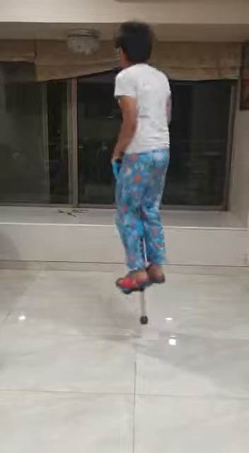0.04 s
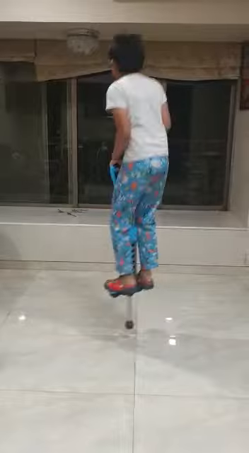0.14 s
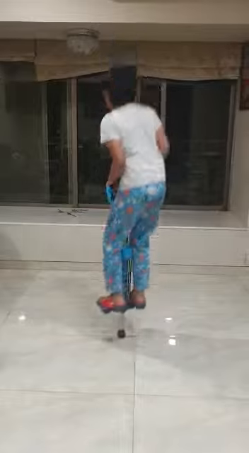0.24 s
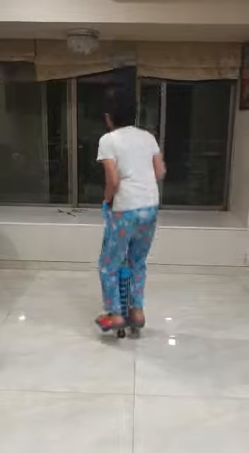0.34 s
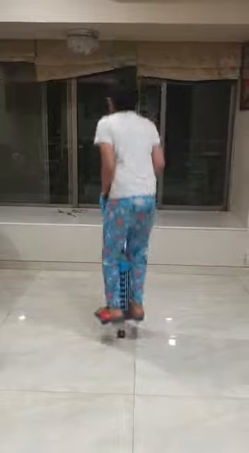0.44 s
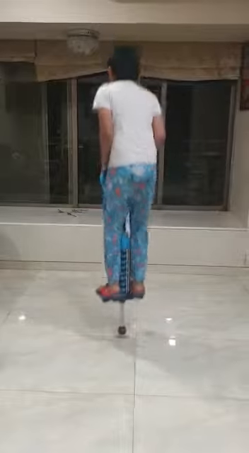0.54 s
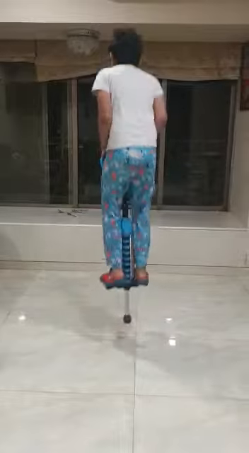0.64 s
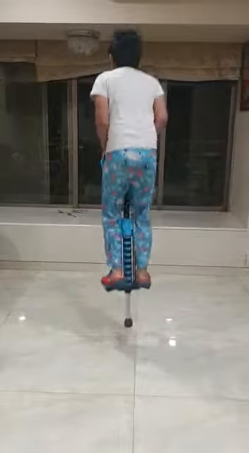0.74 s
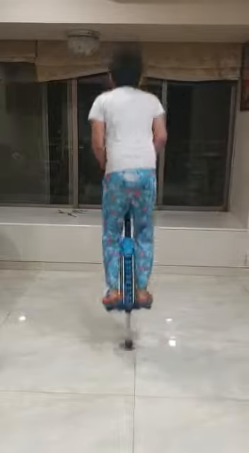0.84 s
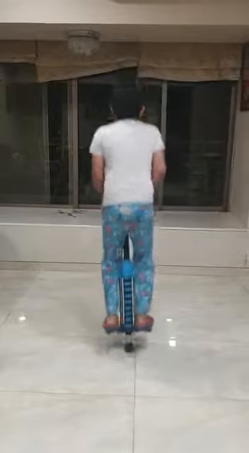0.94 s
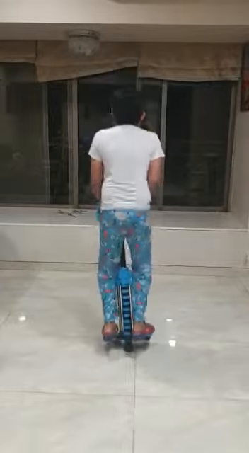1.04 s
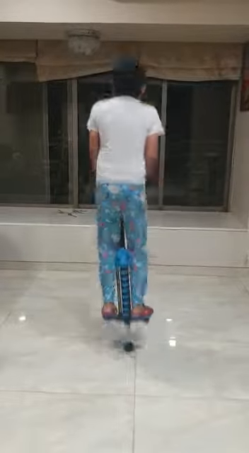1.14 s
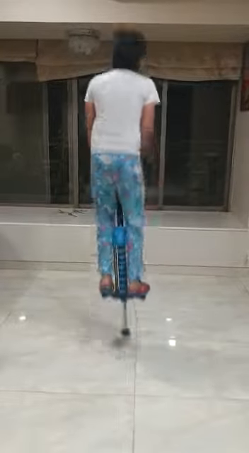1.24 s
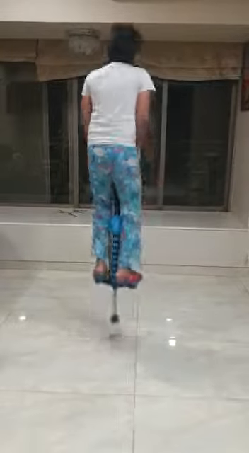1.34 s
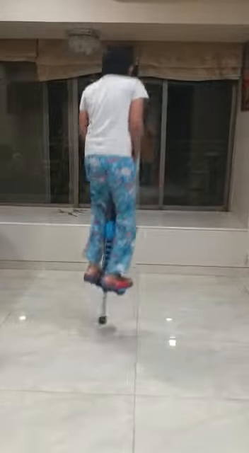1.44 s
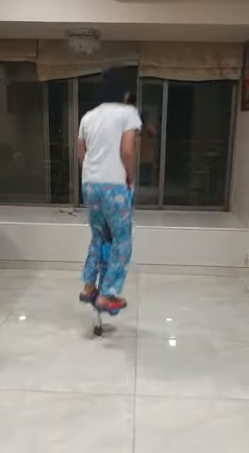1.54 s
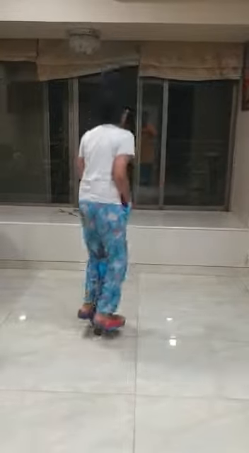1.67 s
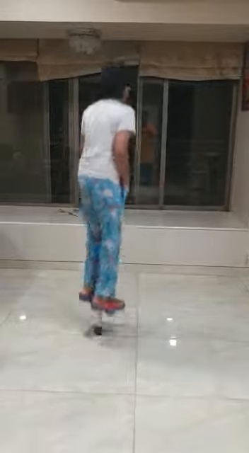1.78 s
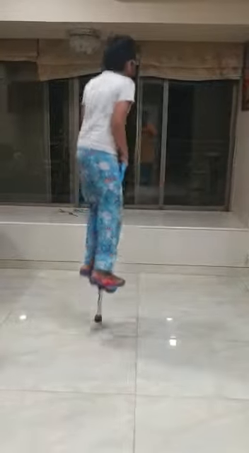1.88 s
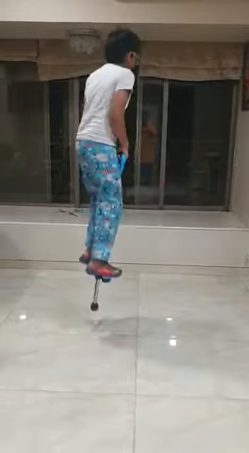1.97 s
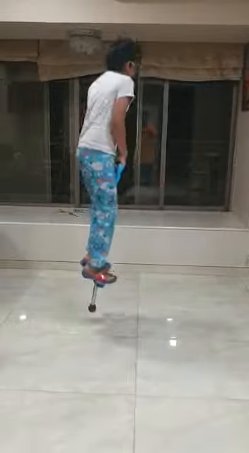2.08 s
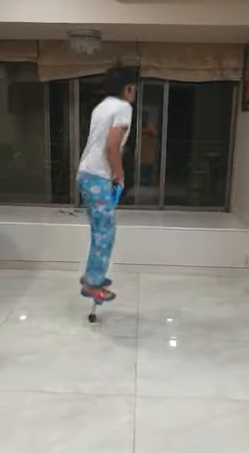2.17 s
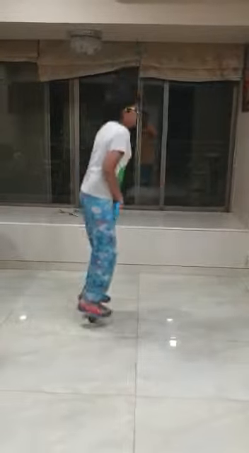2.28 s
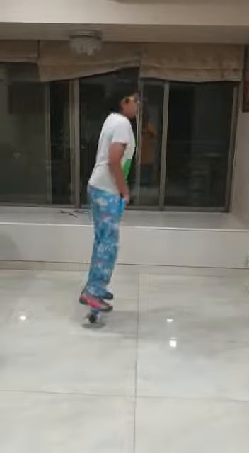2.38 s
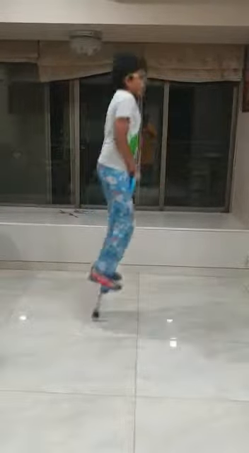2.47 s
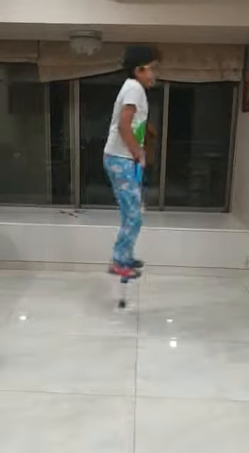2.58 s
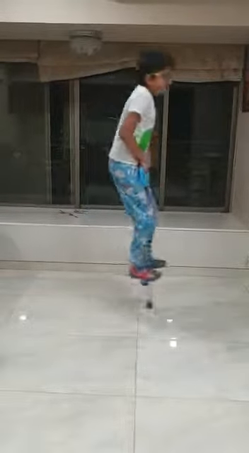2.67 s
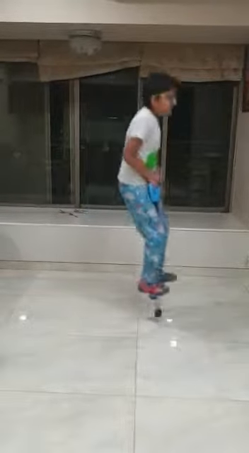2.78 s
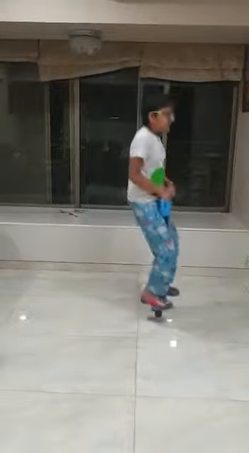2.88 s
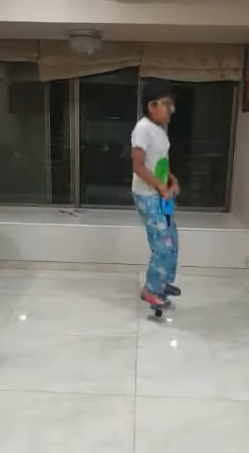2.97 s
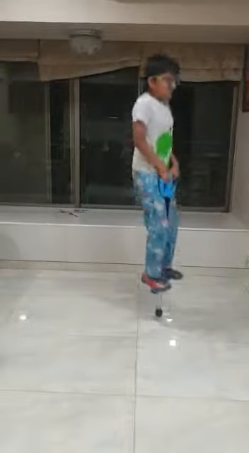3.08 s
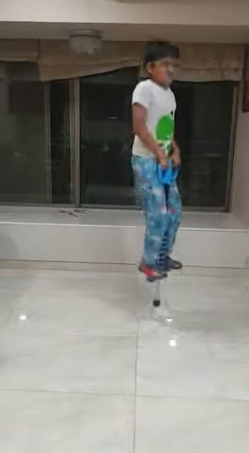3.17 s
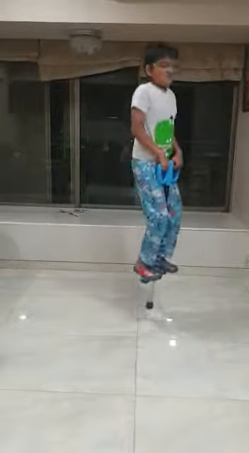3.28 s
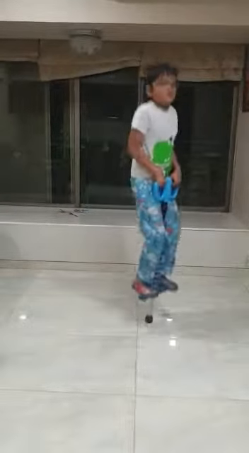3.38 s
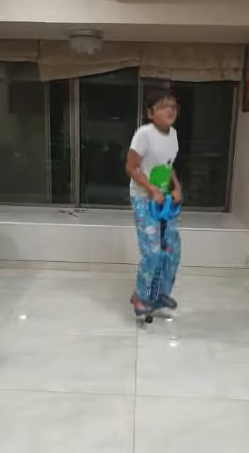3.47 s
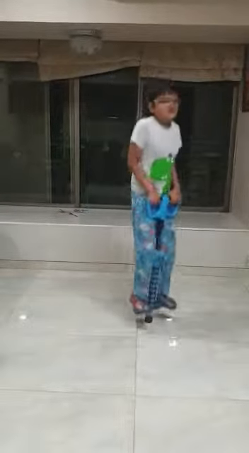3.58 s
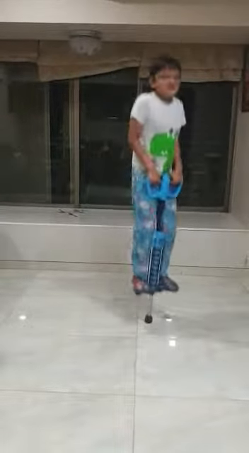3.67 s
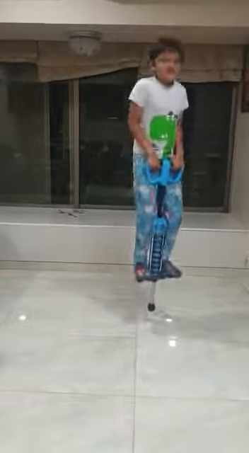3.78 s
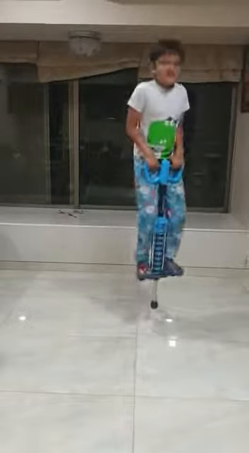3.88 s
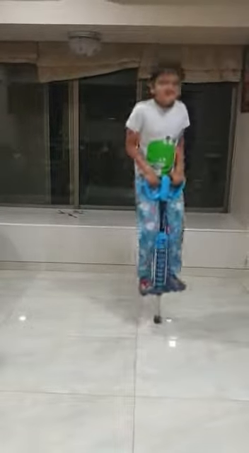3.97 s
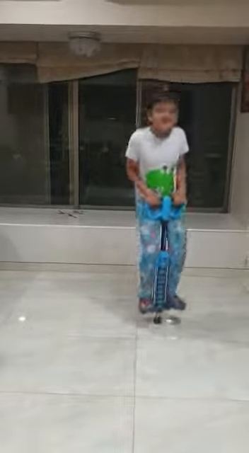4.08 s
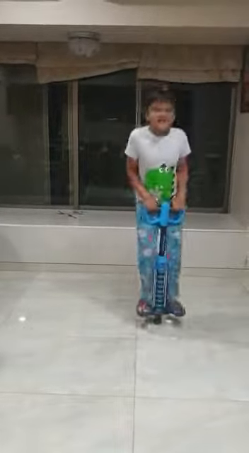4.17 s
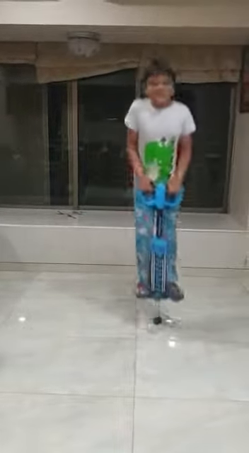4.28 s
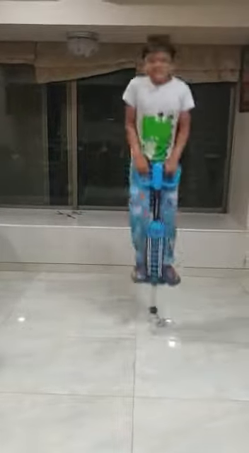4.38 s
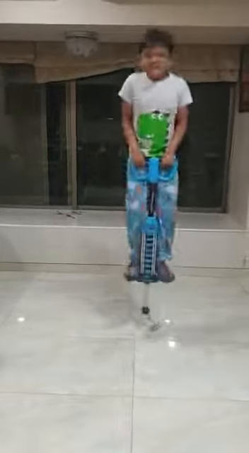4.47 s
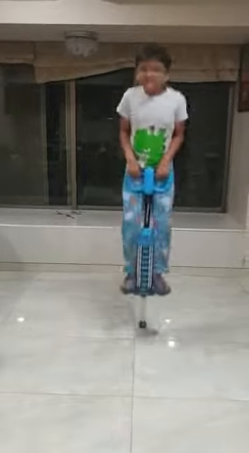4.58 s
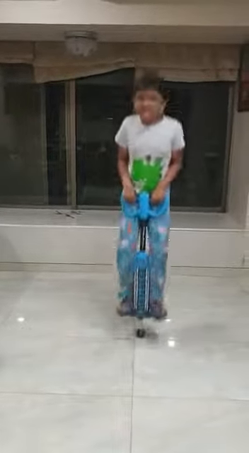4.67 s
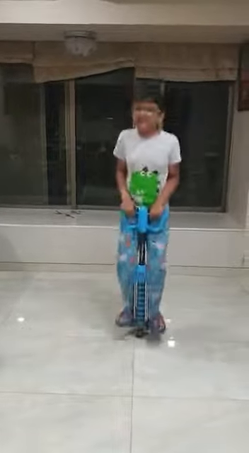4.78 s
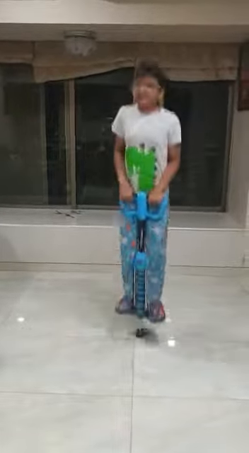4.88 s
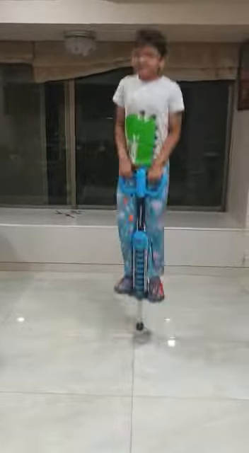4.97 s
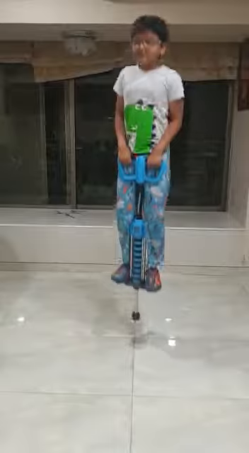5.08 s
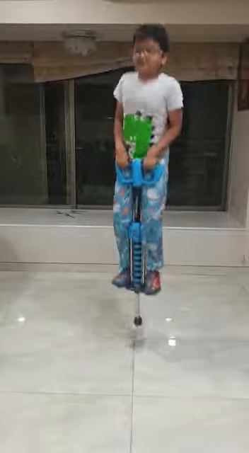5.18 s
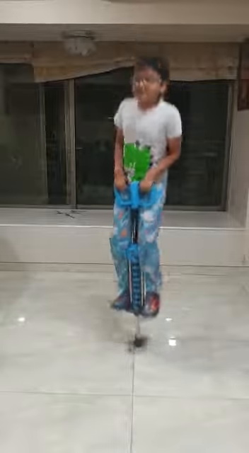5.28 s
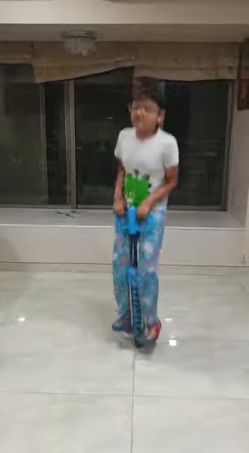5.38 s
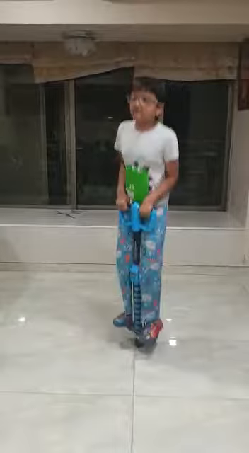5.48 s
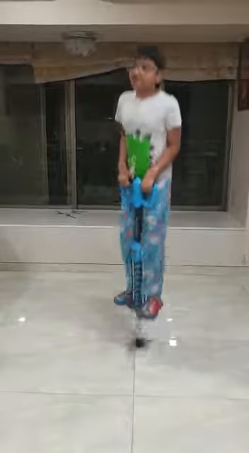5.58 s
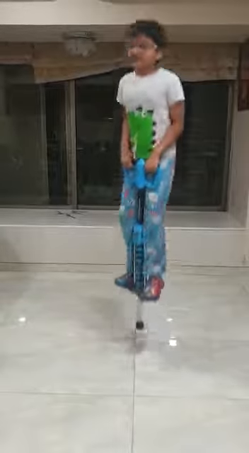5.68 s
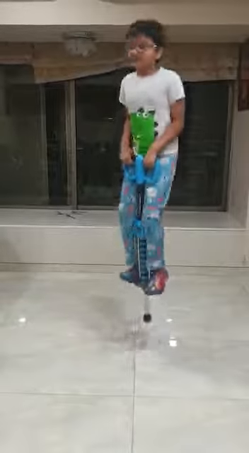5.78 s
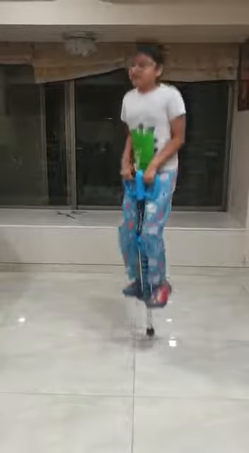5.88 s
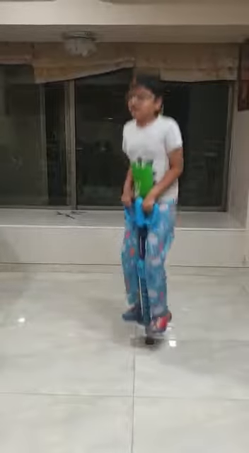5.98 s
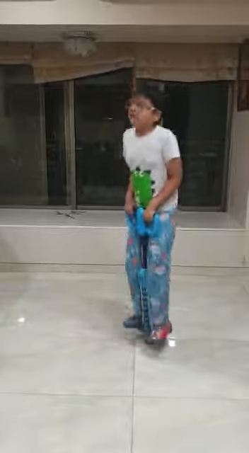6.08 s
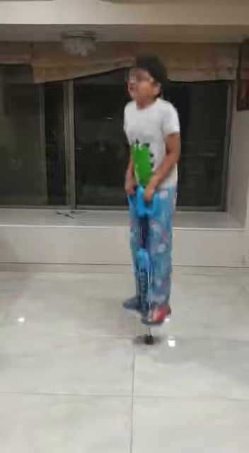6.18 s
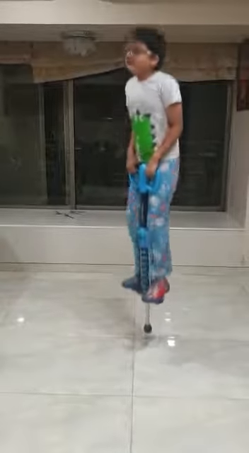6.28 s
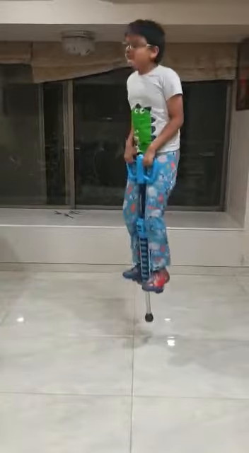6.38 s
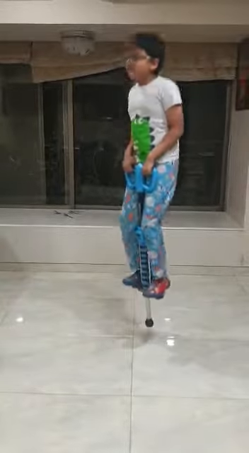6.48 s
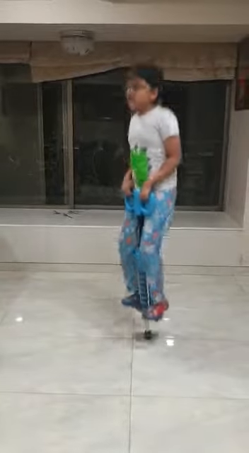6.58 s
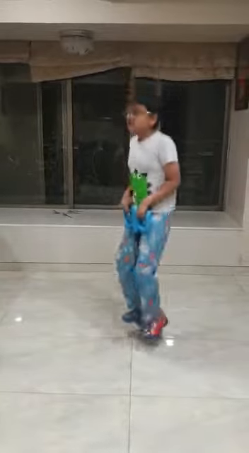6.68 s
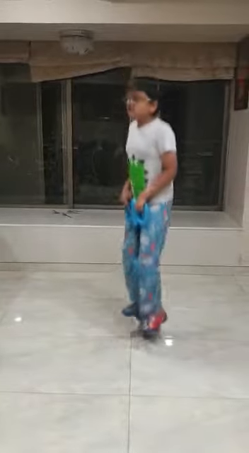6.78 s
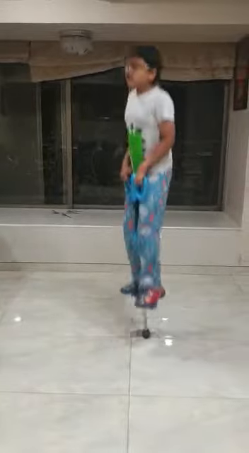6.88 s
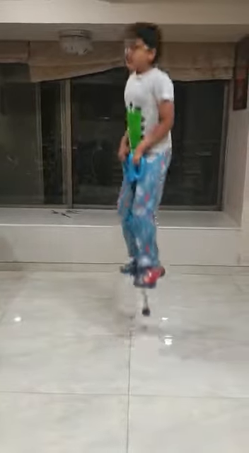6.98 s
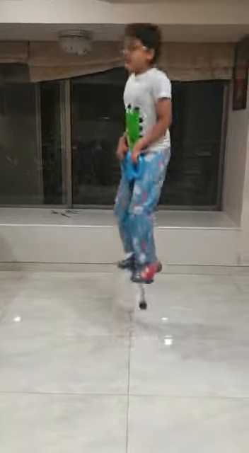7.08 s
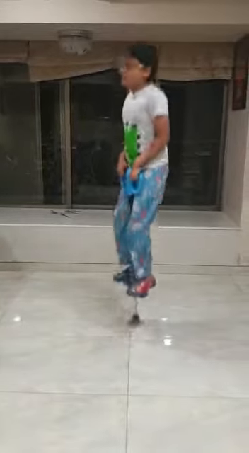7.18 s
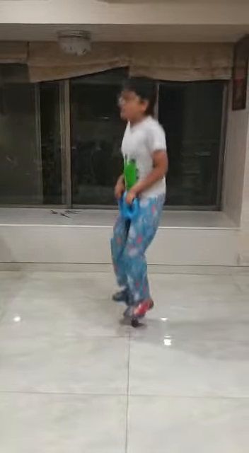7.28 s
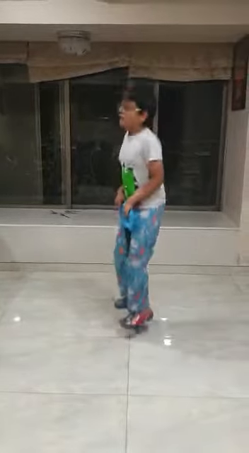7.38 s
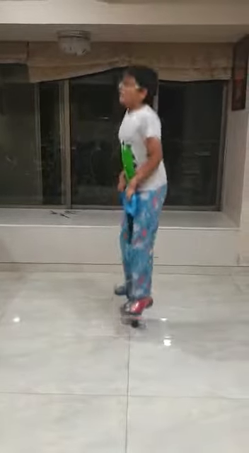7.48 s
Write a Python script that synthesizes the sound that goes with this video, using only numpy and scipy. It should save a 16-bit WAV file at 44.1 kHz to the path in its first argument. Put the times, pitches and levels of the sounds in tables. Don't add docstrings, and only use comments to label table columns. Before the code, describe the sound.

A fading clack opens, then a pogo stick bounces about every two thirds of a second. Each landing is a hard knock with a dull thud, then a faint scrape and spring rumble, a low thump or tick at the bottom, a rising scrape and a metal-on-plastic clack. Bare, echoing tiled living room, with the microphone a few metres away and slightly brighter on the right.

```python
import sys
import numpy as np
from scipy import signal
from scipy.fft import rfft, irfft
from scipy.io import wavfile

SR = 44100
rng = np.random.default_rng(int(sys.argv[2]) if len(sys.argv) > 2 else 0)


def digitize_waveform(pressure):
    field = np.atleast_2d(pressure).T
    bounded = np.clip(field, -1, 1)
    quanta = np.round(bounded * 32767).astype(np.int16)
    wavfile.write(sys.argv[1], SR, quanta)


def nominal_scale(level):
    x = np.asarray(level, float) / 20
    return 10 ** x


N = 332514
LEAD = 4410
LONG, TAIL = N + LEAD, 30000

# [t/s, knock level/dB, scrape level/dB as the shaft slows, spring rumble level/dB]
LANDINGS = [(0.2708, -9, -32.5, -23), (0.9147, -6, -31.5, -41), (1.5726, -9.5, -31, -24),
            (2.2057, -10.5, -26.5, -33), (2.801, -10, -32, -33.5), (3.4107, -14, -30.5, -34),
            (4.0347, -7, -23, -33), (4.6750, -8, -29, -24.5), (5.3275, -7.5, -30, -28),
            (5.9642, -7, -29, -31), (6.598, -9, -32, -29.5), (7.2630, -11, -34, -34)]
# [t/s, touch level/dB, treble edge of the knock level/dB]
TOUCHES = [(0.2684, -18, -0.5), (.9130, -16.5, -6), (1.572, -24, 6), (2.2030, -18, -4.5), (2.7975, -18, -2),
           (3.4090, -28, 6.5), (4.0318, -24, 1), (4.6708, -21, -0.5), (5.3263, -24, 3),
           (5.9625, -14.5, 2.5), (6.5947, -17.5, -9), (7.2568, -22, 2)]
# [t/s, thump level/dB, tick level/dB]
BOTTOMS = [
    (.405, -7.5, -30),
    (1.055, -17, -17.5),
    (1.695, -9, -19),
    (2.355, -15, -16),
    (4.160, -16, -15),
    (4.800, -18, -17),
    (5.438, -8, -14.5),
    (6.076, -10, -11.5),
    (6.765, -15, -27),
    (7.386, -18, -26),
]
# [t/s, push as scrape level/dB, spring rumble level/dB before the halt]
REBOUNDS = [(.476, -24.5, -31), (1.125, -22.5, -27), (1.773, -22.5, -29.5), (2.417, -23.5, -32),
            (3.024, -27.5, -31.5), (3.620, -24.5, -27.5), (4.232, -21.5, -27.5), (4.872, -21, -30),
            (5.535, -23, -28), (6.152, -20, -26.5), (6.815, -23.5, -33), (7.468, -27, -32.5)]
# [t/s, clack level/dB]
STOPS = [(0.58, -7.5), (1.2366, -7), (1.877, -11.5), (2.512, -8), (3.129, -11), (3.731, -13.5),
         (4.347, -9.5), (4.986, -10.5), (5.631, -10), (6.263, -11), (6.9187, -8)]
# [t/s, clack level/dB]
EARLIER_STOP = (-0.05, -10.5)

# [f/Hz, level/dB per Hz]
KNOCK = [(240, -30), (400, 2.5), (747, -12), (999, 1), (1260, -4), (1890, -5.5), (2310, -1.5), (3090, -4.5),
         (6420, -10), (8700, -10), (12900, -7.5), (15300, -15)]
# [f/Hz, level/dB per Hz]
THUD = [(71, -31), (120, -4.5), (183, -17.5), (226, 0), (286, -1), (356, -3), (653, -9), (900, -7),
        (1170, -18.5), (1980, -120)]
# [f/Hz, level/dB per Hz]
CLACK = [(65, -36), (110, -10.5), (290, -8), (551, -9.5), (663, -8), (799, -5.5), (962, -0.5), (1790, -6.5),
         (1900, -1.5), (2490, 2.5), (2870, -2.5), (7900, -10.5), (8760, -12.5), (11500, -9), (15300, -14)]
# [f/Hz, level/dB per Hz]
SCRAPE = [(760, -42), (1300, -3), (1580, -2.5), (2650, 1), (3390, -4), (4440, -3.5), (5510, -11.5),
          (6910, -10.5), (8590, -14), (13100, -17), (15300, -18)]
# [f/Hz, level/dB per Hz]
RUMBLE = [(24, -17), (40, -23), (74, 2.5), (124, -12.5), (254, -1), (511, -1), (581, 2), (639, 3), (893, 4),
          (1170, -1), (1800, -9), (2340, -38), (3960, -120)]
# [f/Hz, level/dB per Hz]
THUMP = [(50, -15), (110, -4), (160, -1), (260, -7), (450, -18), (1000, -38)]
# [f/Hz, level/dB per Hz]
HUSH = [(25, -22), (45, 2), (80, 3), (300, -0.5), (1000, -5.5), (3000, -11.5), (8000, -20), (16000, -39)]

# [f/Hz, level/dB, t60/s]
BOOMS = [(70, -32, 0.4), (159.4, -36, 0.35), (208, -36, 0.23), (244.3, -35.5, 0.23), (328, -35, 0.6)]
# [f/Hz, t60/s]
ROOM_T60 = [(60, 0.5), (160, 0.53), (420, 0.62), (1100, 0.69), (2900, 0.64), (7000, 0.6), (14000, 0.38)]
# [f/Hz, correlation]
LIKENESS = [(60, 1), (130, 0.98), (290, 1), (640, 0.26), (1410, -0.2), (3100, 0.095), (6820, -0.043),
            (15000, 0.06)]
# [f/Hz, left minus right level/dB]
PAN = [(40, 1.5), (110, -0.5), (200, -1.5), (380, -3), (700, -6), (1290, -4.5), (2380, -6), (4400, -6.5),
       (6500, -7), (8500, -4), (10500, 4.5), (12000, -8), (13500, -6), (15500, -2)]
# [f/Hz, left level/dB, right level/dB]
DIRECT = [(100, -6, -7), (600, -13.5, -10.5), (2430, -14.5, -10.5), (5000, -27, -9), (9100, -25, -10.5),
          (11400, -1, -3), (13800, -28, -4.5)]

HUSH_DB = -47.5
THUD_DB, THUD_FOLLOWS = 5.5, 0.35
SEAT_S, GRAZE_DB = 0.001096, -11.5
FRAME_DB = -6.0
RING_OVER_PUSH_DB, USUAL_PUSH_DB = 15.0, -25
SCRAPE_DOWN_DB, SCRAPE_UP_END_DB = -29, -31
RUMBLE_UP_DB, RUMBLE_FOLLOWS = -29.5, 0.54
GRIP_S, HOLD_S, SLOWING_S, HALT_S = 0.026, .01, 0.089, .035
SWELL_S, EASE_S, LIFT_S, LAST_STOP_S = 0.025, 0.023, 0.0063, 7.56
TOP_HZ = 15600


def at_hz(points, hz, column=1):
    points = np.array(points)
    return np.interp(np.log(hz + 1), np.log(points[:, 0]), points[:, column])


def rms_one(x):
    return x / np.sqrt(np.mean(x ** 2) + 1e-20)


def causal(points, column=1, size=8192):
    hz = np.arange(size // 2 + 1) * SR / size
    cepstrum = irfft(np.log(nominal_scale(at_hz(points, hz, column))))
    cepstrum[1:size // 2] *= 2
    cepstrum[size // 2 + 1:] = 0
    return irfft(np.exp(rfft(cepstrum)))[:size // 2]


def colour(x, points):
    response = causal(points)
    return signal.oaconvolve(x, response / np.sqrt(np.sum(response ** 2)))[:LONG]


def shelf(x, hz, kind, times, levels_db):
    which = np.searchsorted(times[1:] - .1, (np.arange(LONG) - LEAD) / SR)
    part = signal.lfilter(*signal.butter(1, hz, kind, fs=SR), x)
    return (nominal_scale(levels_db)[which] - 1) * part


def blows(times, levels_db, contact_s, count=3):
    out = np.zeros(LONG)
    lags = (contact_s * SR * rng.uniform(.15, 1, (len(times), count))).astype(int) + 1
    for s, db, row in zip(times, levels_db, lags):
        burst = np.append(nominal_scale(db), np.zeros(1500))
        for lag in row:
            loop = np.append([1], np.append(np.zeros(lag - 1), .65))
            burst = signal.lfilter(loop[::-1], loop, burst)
        i = round(s * SR) + LEAD
        out[i:i + len(burst)] += burst
    return out


def grit(per_s, spread_db, judder_db):
    sizes = nominal_scale(spread_db * np.minimum(rng.exponential(1, LONG), 3))
    sizes = sizes * rng.choice([-1, 1], LONG)
    knots = LONG // 500 + 2
    clumps = np.interp(np.arange(LONG) / 500, np.arange(knots), rng.standard_normal(knots))
    slips = rng.random(LONG) < per_s / SR
    return rms_one(nominal_scale(judder_db * clumps) * sizes * slips)


def stroke(down_early, down_late, up_early, up_late, halt_db):
    land, turn = np.array(LANDINGS)[:, 0], np.array(REBOUNDS)[:, 0]
    stop = np.append(np.array(STOPS)[:, 0], LAST_STOP_S)
    times = [land, land + GRIP_S, land + GRIP_S + HOLD_S, turn - SLOWING_S, turn - HALT_S, turn - .003,
             turn + SWELL_S, stop - EASE_S, stop, stop + LIFT_S]
    levels = [-90, down_early, down_early, down_late, halt_db, halt_db, up_early, up_late, up_late, -90]
    levels = [0 * land + db for db in levels]
    return np.interp((np.arange(LONG) - LEAD) / SR, np.ravel(times, "F"), nominal_scale(np.ravel(levels, "F")))


def stereo_noise(shape, hz):
    mid, side = rfft(rng.standard_normal((2,) + shape))
    alike = np.clip(at_hz(LIKENESS, hz), -.99, .99)
    mid, side = np.sqrt(1 + alike) * mid, np.sqrt(1 - alike) * side
    return np.array([mid + side, mid - side]) / np.sqrt(2)


def hush():
    hz = np.arange(LONG // 2 + 1) * SR / LONG
    noise = irfft(stereo_noise((LONG,), hz) * nominal_scale(at_hz(HUSH, hz)), LONG)
    return nominal_scale(HUSH_DB) * rms_one(noise)


def room(x):
    moves = sorted(TOUCHES + REBOUNDS + STOPS)
    cuts = [0] + [round((row[0] - .01) * SR) + LEAD for row in moves] + [LONG]
    hz, t = np.arange(TAIL // 2 + 1) * SR / TAIL, np.arange(TAIL) / SR
    noise = stereo_noise((len(cuts) - 1, TAIL), hz)
    moved = at_hz([(120, 0.091), (500, 1)], hz)
    noise = moved * noise + np.sqrt(1 - moved ** 2) * noise[:, :1]
    echoes = 0
    for k, (_, t60) in enumerate(ROOM_T60):
        share = at_hz([(row[0], j == k) for j, row in enumerate(ROOM_T60)], hz)
        decay = nominal_scale(-60 * t / t60) * np.sqrt(6 * np.log(10) / (t60 * SR))
        echoes = echoes + irfft(noise * share) * decay
    echoes *= np.clip((t - .0015) / 0.0016, 0, 1)
    out = np.zeros((2, LONG + TAIL))
    for k, (a, b) in enumerate(zip(cuts, cuts[1:])):
        out[:, a:b + TAIL - 1] += signal.fftconvolve(x[None, a:b], echoes[:, k], axes=1)
    return out[:, :LONG]


def booms():
    push = np.zeros(LONG)
    loads = [(row[0], row[1]) for row in LANDINGS] + [(row[0], row[1] - 3.0) for row in STOPS]
    for s, db in loads:
        push[round((s + .025) * SR) + LEAD] = nominal_scale(db + 3.5)
    out = 0
    for hz, db, t60 in BOOMS:
        r, w = nominal_scale(-60 / (t60 * SR)), 2 * np.pi * hz / SR
        mode = [1, -2 * r * np.cos(w), r * r]
        swell = np.hanning(1400) * np.sin(w * np.arange(1400)) / 350
        drive = signal.oaconvolve(push, swell)[:LONG] + 1e-18
        out = out + nominal_scale(db) * signal.lfilter([0, np.sin(w)], mode, drive)
    return out


def coils():
    s, thump_db, tick_db = np.array(BOTTOMS).T
    tick = np.diff(blows(s, tick_db + 15.0, contact_s=.0015), prepend=0)
    thump = blows(s - .004, thump_db + 8.5, contact_s=0.00304)
    return colour(thump, THUMP) + colour(tick, KNOCK[:-1])


def shaft():
    _, _, slowing_db, down_db = np.array(LANDINGS).T
    _, push_db, bottom_db = np.array(REBOUNDS).T
    up_db = RUMBLE_UP_DB + RUMBLE_FOLLOWS * (push_db - push_db.mean())
    scrape = stroke(SCRAPE_DOWN_DB, slowing_db, push_db, SCRAPE_UP_END_DB, halt_db=-46.5)
    scrape = scrape * grit(per_s=1000, spread_db=5.0, judder_db=4.0)
    rumble = stroke(down_db - 3.5, bottom_db, up_db, up_db - 2.5, halt_db=-40)
    rumble = rumble * grit(per_s=500, spread_db=4.0, judder_db=2.5)
    return colour(scrape, SCRAPE[:-1]) + colour(rumble, RUMBLE)


def top_stop():
    s, db = np.array([EARLIER_STOP] + STOPS).T
    push_db = np.append(USUAL_PUSH_DB, np.array(REBOUNDS)[:len(STOPS), 1])
    graze = blows(s - .0004, db + 25.0 + GRAZE_DB, contact_s=.0006)
    snap = blows(s + SEAT_S, db + 25.5, contact_s=.0006)
    clack = graze + snap
    frame = shelf(clack, 870, "low", s, FRAME_DB - db)
    ring = shelf(clack, 6600, "high", s, push_db + RING_OVER_PUSH_DB - db)
    return colour(clack + frame + ring, CLACK[:-1])


def foot():
    s, knock_db = np.array(LANDINGS).T[:2]
    touch_s, touch_db, edge_db = np.array(TOUCHES).T
    knock = blows(s, knock_db + 21.0, contact_s=.00025)
    knock += shelf(knock, 8000, "high", s, edge_db)
    touch = signal.lfilter([.4], [1, -.6], blows(touch_s, touch_db + 25.5, contact_s=.0012))
    thud_db = THUD_DB + THUD_FOLLOWS * (knock_db - knock_db.mean())
    thud = blows(s - .001, thud_db, contact_s=.005)
    return colour(knock + touch, KNOCK[:-1]) + colour(thud, THUD)


def scene():
    stick = foot() + shaft() + coils() + top_stop()
    direct = np.array([signal.oaconvolve(stick, causal(DIRECT, column=c))[:LONG] for c in (1, 2)])
    return (direct + room(stick) + booms() + hush())[:, LEAD:]


def top_cut(x):
    return signal.sosfilt(signal.butter(12, 16840, fs=SR, output="sos"), x)


def record(dry):
    ports = [causal([(hz, side * db / 2) for hz, db in PAN]) for side in (1, -1)]
    x = np.array([signal.oaconvolve(c, port)[:N] for c, port in zip(dry, ports)])
    x = signal.sosfilt(signal.ellip(8, .5, 40, TOP_HZ, fs=SR, output="sos"), x)
    return top_cut(np.clip(x, -1, 1))


dry = scene()
out = record(dry)
digitize_waveform(out)
```